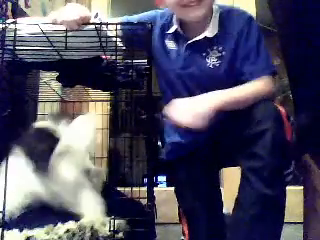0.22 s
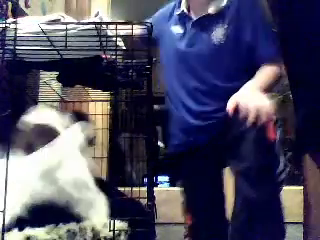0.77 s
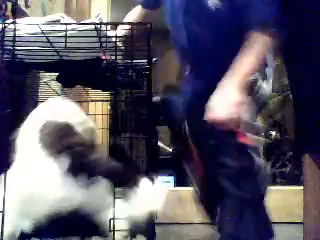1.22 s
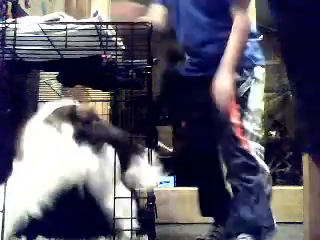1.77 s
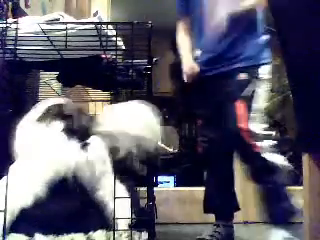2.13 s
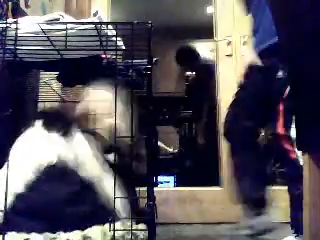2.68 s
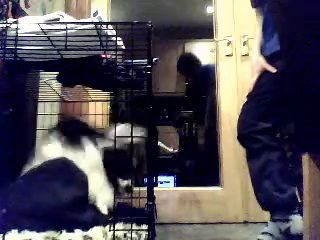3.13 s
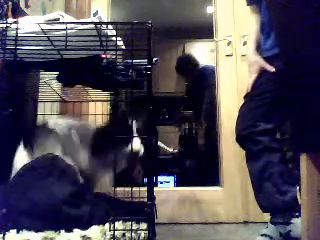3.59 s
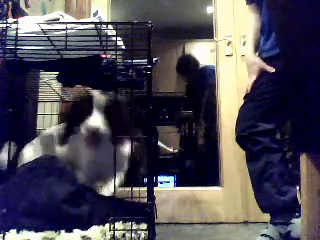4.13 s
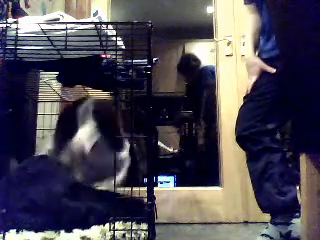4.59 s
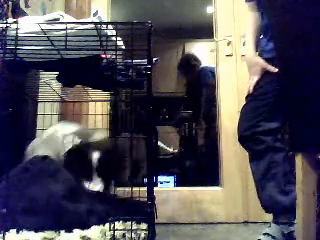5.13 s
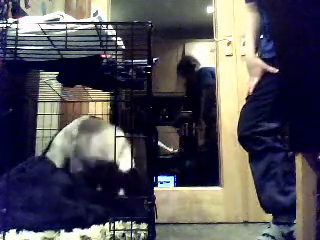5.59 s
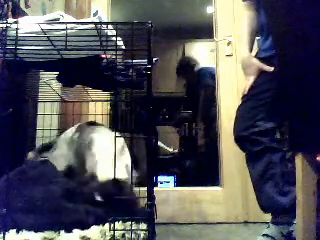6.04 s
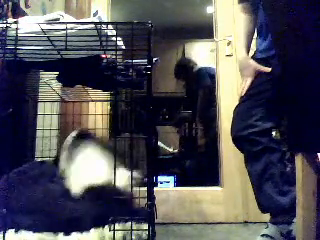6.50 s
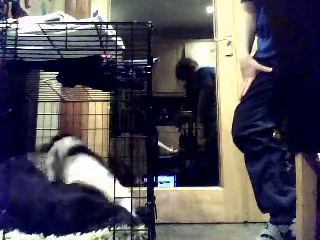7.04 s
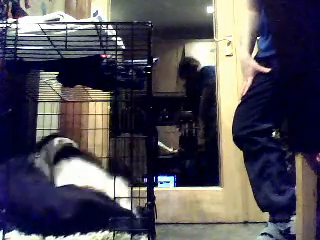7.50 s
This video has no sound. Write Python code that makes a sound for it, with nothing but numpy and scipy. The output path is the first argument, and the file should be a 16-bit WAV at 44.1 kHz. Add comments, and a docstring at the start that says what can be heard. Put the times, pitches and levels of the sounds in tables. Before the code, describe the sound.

A dog moves about in a wire crate with a plastic tray, close to a cheap microphone in a small room. Light taps give way to a loud shaking rattle and a hard metallic crash. After a lull of ticks and faint bedding rustle, separate bangs and soft thuds follow, ending in a dense burst of rattling. A low hum and faint fan whine lie underneath.

```python
"""Light taps over a low hum, then loud crashes: a dog throws itself about in a wire crate on a plastic
tray, in a small room, close to a webcam microphone. Each blow cracks and rings the crate's modes, the
loose wires rattle on, and a near wall echoes. Bedding rustles and a fan whines faintly behind.
The webcam's noise suppressor pushes down the room hum and cuts the tails short; the loudest bangs clip."""
import sys
import numpy as np
from scipy import signal
from scipy.fft import rfft, irfft, next_fast_len
from scipy.io import wavfile
from scipy.ndimage import uniform_filter1d

SR = 44100
rng = np.random.default_rng(int(sys.argv[2]) if len(sys.argv) > 2 else 0)


def put_to_file(sound):
    """Save the sound as 16-bit audio at rate SR, in the file named by the first command-line argument."""
    columns = np.atleast_2d(sound).T  # one column per channel
    safe = np.clip(columns, -1, 1)
    whole_steps = np.round(safe * 32767)
    wavfile.write(sys.argv[1], SR, whole_steps.astype(np.int16))


N = 341775

# Sharp bangs on the wires (all levels are relative):
# t/s, strength/dB, brightness/dB, tray level/dB, wires over strength/dB, rattle t60/s
WIRE_BANGS = [(1.121, -27, -2.5, -25.5, -0.5, 0.063), (1.6897, -8.5, -2, -13, 0.5, 0.32),
              (3.4342, -21.5, 8.5, -38.5, -2.5, 0.21), (3.4886, -27.5, -0.5, -30.5, 3, 0.13),
              (3.8945, -11.5, -2.5, -16, 4.5, 0.37), (4.6464, -16.5, -2, -23.5, 3, 0.22),
              (5.5419, -21.5, 0, -37.5, 4, 0.29), (5.6257, -25, 2, -40.5, 4, .2),
              (5.8243, -18.5, 4.5, -37.5, 6, 0.31), (6.4628, -21, 1, -40, 2, 0.27),
              (6.4898, -28.5, -1, -35.5, 8.5, 0.31), (6.7656, -16.5, 4, -27, -1, .18),
              (7.1443, -38, -18, -32, 8.5, .1), (7.265, -18.5, 1, -30.5, 1.5, 0.26),
              (7.5234, -26, 3.5, -32, 3.5, .15), (7.745, -17.5, 6.5, -19.5, 2.5, 0.23)]
# Softer blows without a strong crack, mostly thuds of paw and body, plus one short click: t/s, strength/dB,
# brightness/dB, tray level/dB, rattle t60/s
SOFT_BLOWS = [(1.098, -31, -2.5, -25.5, .14), (1.481, -32.5, -7, -41.5, .08), (1.526, -29.5, -1, -36, .2),
              (3.345, -37, -5, -23, .075), (4.627, -24, -5.5, -18, 0.085),
              (4.795, -21.5, -4.5, -19.5, 0.027), (4.809, -23.5, -4.5, -17.5, .06),
              (4.822, -24, 0.5, -16, 0.027), (6.588, -29.5, -3, -33, 0.13),
              (6.795, -31.5, -3.5, -22, 0.068)]
# Light taps on the crate: t/s, strength/dB, brightness/dB, tray level/dB
LIGHT_TAPS = [(.003, -38.5, -3, -55), (0.189, -41, -4.5, -48.5), (.433, -39, 0.5, -50.5),
              (.471, -38, -1.5, -35), (.807, -42.5, -10, -39), (1.02, -47.5, -7, -48.5),
              (2.102, -42.5, -3.5, -43.5), (2.343, -45, -8, -43), (2.436, -45.5, -2.5, -44.5),
              (2.653, -42.5, 4, -53.5), (2.786, -33.5, 0, -27.5), (2.916, -41, -8.5, -50),
              (2.991, -42.5, -10, -40), (3.002, -42.5, -9.5, -29.5), (3.195, -48, -12.5, -36.5),
              (3.685, -42.5, -7, -52.5), (6.027, -44, -11.5, -41.5), (6.884, -42, -2, -32),
              (6.922, -41, -1.5, -50.5)]
# The whole crate shaken, one curve per shake: t/s, strength/dB, brightness/dB
SHAKE_CURVES = [
    [(1.215, -53.5, 0.5), (1.232, -24, 3.5), (1.258, -14, -1.5), (1.304, -13, -2), (1.355, -17, -6.5),
     (1.38, -19, -5.5), (1.42, -20, 0), (1.447, -26, -3), (1.47, -36.5, -7.5)],
    [(1.535, -36, -2), (1.555, -27, -3), (1.575, -37, -3.5), (1.59, -50, -5)],
    [(6.61, -38, -4.5), (6.62, -23.5, -2.5), (6.634, -22.5, 1.5), (6.682, -28.5, 0), (6.725, -42, -4.5)],
    [(7.385, -42, 2), (7.412, -19.5, 1.5), (7.437, -14, 0.5), (7.47, -25.5, 0.5), (7.51, -25, 1.5)],
    [(7.53, -34, -1), (7.564, -22, -0.5), (7.59, -22, 5), (7.604, -13, 11), (7.625, -23, 7),
     (7.678, -29, 6.5), (7.735, -35.5, 2.5)],
]
# Ranges of the four parts (tray, panels, wires, wire ticks): low f/Hz, high f/Hz
PART_BANDS = [(40, 437), (500, 1548), (1500, 3760), (3500, 9150)]
# Modes of tray, panels and wires: f/Hz, t60/s, level/dB
CRATE_MODES = [(258, 0.037, -2), (634, 0.037, -9.5), (843, 0.097, -8), (1090, 0.082, -0.5),
               (1229, 0.093, -4.5), (1343, 0.06, -5.5), (1686, 0.03, -4), (1813, 0.12, -9), (2049, .05, -5),
               (2410, 0.066, -11), (2750, 0.059, -14), (3040, 0.045, -18.5), (3540, .06, -14.5),
               (3965, .06, -2.5), (4425, 0.17, -9), (4840, 0.046, -6.5), (5220, 0.06, -10.5)]
# Early echoes off the near walls: delay/s, level/dB
WALL_ECHOES = [(.0123, -9.5), (0.0036, -21.5), (0.018, -18.5), (0.019, -20)]
# Body and bedding stirring in the crate: t/s, level/dB
BEDDING_STIR = [(0, -51), (0.149, -47.5), (.45, -50.5), (0.601, -54.5), (1.9, -43.5), (1.999, -51),
                (2.1, -43), (2.249, -51.5), (2.4, -46.5), (2.6, -52), (3.8, -58), (3.871, -46), (4.4, -57),
                (4.901, -50), (5.298, -58.5), (6.85, -49), (6.999, -56), (7.75, -51.5)]
# Spectrum of the room hum: f/Hz, density/dB
HUM_SPECTRUM = [(20, 4), (150, 0.5), (230, 2.5), (320, 0.5), (420, -3.5), (600, -1), (1200, -5), (1600, -7),
                (4000, -15), (7000, -16.5), (12000, -16.5)]
# Lines of the fan whine: f/Hz, width/Hz, level/dB
FAN_LINES = [(1160, 18, -48.5), (2280, 30, -71.5), (3800, 35, -62), (4370, 20, -58)]

BANG_CRACK_DB, THUD_CRACK_DB, TAP_CRACK_DB = 10.5, -5.5, 6  # crack over rattle
BANG_RISE_S, THUD_RISE_S, TAP_RISE_S, TAP_T60_S = 0.0034, 0.0019, 0.0013, 0.063
WIRE_DB, SHAKE_TRAY_DB = 2.5, -11  # wires and shaken tray over the strength
LOW_T60_RATIO = 1.088  # tray and panels outlast the wires
JOLT_GAP_S, JOLT_T60_S, JOLT_DB = 0.025, 0.12, -2


def crate_rattle():
    """The crate, close to the microphone: each part chatters in its own band and excites the modes."""
    rattle = np.zeros(N)
    forces = contact_forces(crack_t60=0.013, spiky_db=2.0)
    for force, (lo_hz, hi_hz) in zip(forces, PART_BANDS):
        noise = signal.sosfilt(passband(lo_hz, hi_hz, order=3), force * rng.standard_normal(N))
        rattle += noise / np.sqrt((hi_hz - lo_hz) / (SR / 2))  # make up for the band's width
    return filtered(rattle, lambda f: 1 + sum(
        amp(db) * resonance(f, hz, np.log(1000) / np.pi / t60) for hz, t60, db in CRATE_MODES))


def crate_ringing(scatter_db, detune):
    """Every blow or jolt lands on other wires, so the modes start at new strengths and pitches."""
    sound = np.zeros(N + SR)
    t = np.arange(SR // 10) / SR
    hz, mode_t60, mode_db = np.transpose(CRATE_MODES)[:, :, None]
    part_of_mode = np.searchsorted([hi_hz for _, hi_hz in PART_BANDS], hz)
    contacts = blows() + jolts()
    draws = rng.standard_normal((99, 2, len(CRATE_MODES), 1))
    for (start, part_db, _, rise, rattle_t60), (level_draw, pitch_draw) in zip(contacts, draws):
        decay_db = 30 * t * (1 / mode_t60 + 1 / rattle_t60)  # mean of the two decay rates
        level_db = np.array(part_db)[part_of_mode] + mode_db + scatter_db * level_draw - decay_db
        tones = amp(level_db) * np.sin(2 * np.pi * hz * (1 + detune * pitch_draw) * t)
        attack = 1 - np.exp(-t / rise)
        sound[round(start * SR):][:len(t)] += tones.sum(axis=0) * attack
    return sound[:N]


def contact_forces(crack_t60, spiky_db):
    """Drive on each part: a hit gives a short crack and a dying rattle; a shake rattles throughout."""
    crack_power, rattle_power = np.zeros((2, 4, N + SR))
    taps = [(start, part_levels(*levels), TAP_CRACK_DB, TAP_RISE_S, TAP_T60_S)
            for start, *levels in LIGHT_TAPS]
    for start, part_db, crack_db, rise, wire_t60 in blows() + taps:
        t60 = wire_t60 * np.array([LOW_T60_RATIO, LOW_T60_RATIO, 1, 1])[:, None]
        t = np.arange(round(0.7 * t60.max() * SR)) / SR
        power = amp(part_db)[:, None] ** 2  # unrelated shocks add in power
        attack = 1 - np.exp(-t / rise)
        span = slice(round(start * SR), round(start * SR) + len(t))
        crack_power[:, span] += power * amp(crack_db - 60 * t / crack_t60) ** 2
        rattle_power[:, span] += power * (attack * amp(-60 * t / t60)) ** 2
    for curve in SHAKE_CURVES:
        span = np.arange(round(curve[0][0] * SR), round(curve[-1][0] * SR))
        rattle_power[:, span] += amp(shake_levels(curve, span / SR)) ** 2
    return np.sqrt(crack_power[:, :N] + rattle_power[:, :N] * chatter(spiky_db) ** 2)


def blows():
    """The dog's bangs and thuds: t/s, part levels/dB, crack/dB, rise/s, rattle t60/s."""
    kinds = [(WIRE_BANGS, BANG_CRACK_DB, BANG_RISE_S), (SOFT_BLOWS, THUD_CRACK_DB, THUD_RISE_S)]
    return [(start, part_levels(*levels), crack_db, rise, t60)
            for rows, crack_db, rise in kinds for start, *levels, t60 in rows]


def jolts():
    """A shake jolts the modes again and again with soft, uneven contacts; columns as for blows."""
    contacts = []
    for curve in SHAKE_CURVES:
        times = np.arange(curve[0][0], curve[-1][0], JOLT_GAP_S)
        times += JOLT_GAP_S * rng.uniform(size=40)[:len(times)]
        for start, part_db in zip(times, shake_levels(curve, times).T):
            contacts.append((start, part_db + JOLT_DB, 0, THUD_RISE_S, JOLT_T60_S))
    return contacts


def shake_levels(curve, t):
    """Levels of the four parts at times t while the whole crate shakes."""
    times, strength_db, bright_db = np.transpose(curve)
    level_db = np.interp(t, times, strength_db)
    return np.array(part_levels(level_db, np.interp(t, times, bright_db), level_db + SHAKE_TRAY_DB))


def part_levels(strength_db, bright_db, tray_db, wire_db=WIRE_DB):
    """Levels of tray, panels, wires and ticks; brightness lifts the ticks and lowers the panels."""
    return [tray_db, strength_db - bright_db, strength_db + wire_db, strength_db + bright_db]


def chatter(spiky_db):
    """Uneven sizes of tiny contacts, each just under a millisecond long."""
    sizes = amp(spiky_db * rng.exponential(size=N // 32 + 1))
    return unit_rms(np.repeat(sizes, 32)[:N])


def small_room(direct, tail_db, tail_t60, dull_hz):
    """Near walls add a few early echoes and a short diffuse tail, both duller than the direct sound."""
    t = np.arange(SR // 3) / SR
    response = amp(-60 * t / tail_t60) * rng.standard_normal(len(t))
    response *= amp(tail_db) / np.linalg.norm(response)
    for delay, db in WALL_ECHOES:
        response[round(delay * SR)] += amp(db)
    reflected = signal.fftconvolve(direct, response)[:N]
    return direct + filtered(reflected, lambda f: 1 / (1 + 1j * f / dull_hz))


def bedding():
    """Fabric brushes on fabric inside the crate: a grainy hiss."""
    grains = chatter(spiky_db=2.0) * rng.standard_normal(N)
    hiss = signal.sosfilt(passband(2000, 4900, order=2), grains)
    return amp(stir_db()) * unit_rms(hiss)


def stir_db():
    """Level of the stirring at every sample."""
    return np.interp(np.arange(N) / SR, *np.transpose(BEDDING_STIR))


def room_hum(level_db, patchy_db, stir_follow):
    """Room tone: a low, slightly patchy noise that swells a little with the stirring."""
    spectra = signal.stft(rng.standard_normal(N + 512), nperseg=512)[2]
    patches = uniform_filter1d(rng.standard_normal(spectra.shape), size=6, axis=0)
    patches = unit_rms(uniform_filter1d(patches, size=12, axis=1))
    noise = signal.istft(spectra * amp(patchy_db * patches), nperseg=512)[1][:N]
    hz, db = np.transpose(HUM_SPECTRUM)
    hum = filtered(noise, lambda f: amp(np.interp(np.log(f + 1), np.log(hz), db)))
    swell_db = stir_follow * (stir_db() - stir_db().mean())
    return amp(level_db + swell_db) * unit_rms(hum)


def fan_whine():
    """A fan, faint in the background: steady, narrow lines of noise."""
    return filtered(rng.standard_normal(N), lambda f: sum(
        amp(db) * resonance(f, hz, width) ** 2 / np.sqrt(np.pi / 2 * width / SR)
        for hz, width, db in FAN_LINES))


def noise_suppressor(x, margin_db, knee_db, depth_db, overall_share):
    """The webcam turns down each band that, with a share of the whole, stays near its noise floor."""
    def over_floor_db(power):
        power = power + 1e-16
        return 10 * np.log10(power / np.percentile(power, 30, axis=-1, keepdims=True))

    spectra = signal.stft(np.pad(x, (0, 512)), nperseg=512, noverlap=384)[2]
    power = uniform_filter1d(np.abs(spectra) ** 2, size=24, axis=0)  # smooth over frequency
    power = np.abs(uniform_filter1d(power, size=3, axis=1))  # and over time
    over_db = overall_share * over_floor_db(power.sum(axis=0))
    over_db = over_db + (1 - overall_share) * over_floor_db(power)
    cut_db = depth_db / 2 * (1 - np.tanh((over_db - margin_db) / knee_db))
    return signal.istft(spectra * amp(-cut_db), nperseg=512, noverlap=384)[1][:N]


def amp(db):
    return 10 ** (np.asarray(db) / 20)


def unit_rms(x):
    return x / np.sqrt(np.mean(x ** 2) + 1e-20)


def filtered(x, response):
    """Pass x through a complex response of frequency."""
    size = next_fast_len(N + SR // 2)
    return irfft(rfft(x, size) * response(np.fft.rfftfreq(size, 1 / SR)), size)[..., :N]


def resonance(f, hz, width):
    """A causal resonance of peak gain 1."""
    return 1j * f * width / (hz * hz - f * f + 1j * f * width)


def passband(lo_hz, hi_hz, order):
    return signal.butter(order, [lo_hz, hi_hz], "bandpass", fs=SR, output="sos")


def scene():
    """At the microphone: the crate close by in its small room, then bedding, hum and fan."""
    crate = amp(-1.5) * (crate_rattle() + crate_ringing(scatter_db=4.5, detune=0.022))
    sound = small_room(crate, tail_db=-16.5, tail_t60=0.23, dull_hz=3404) + bedding()
    background = room_hum(level_db=-37.5, patchy_db=0.5, stir_follow=0.17) + fan_whine()
    return (sound + background)[None]


def record(dry):
    """Mono webcam microphone: voice band over weaker bass, suppressor, soft overload, band limit."""
    clip_level, top_hz = 0.76, 15741
    voice_band = signal.sosfilt(passband(170, 6380, order=8), dry[0])
    bass = amp(-9.5) * signal.sosfilt(passband(7.9, 150, order=4), dry[0])
    gated = noise_suppressor(voice_band + bass, margin_db=11.5, knee_db=6.5, depth_db=16.0,
                             overall_share=0.082)
    # the envelope of loud rattles leaks into the bass
    rumble = 0.12 * signal.sosfilt(passband(8.5, 140, order=2), gated ** 2)
    clipped = gated / (1 + np.abs(gated / clip_level) ** 6) ** (1 / 6)
    return filtered(clipped + rumble, lambda f: f < top_hz)[None]


dry = scene()
out = record(dry)
put_to_file(out)
```